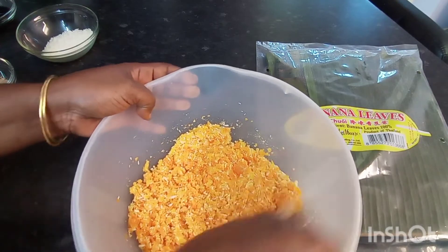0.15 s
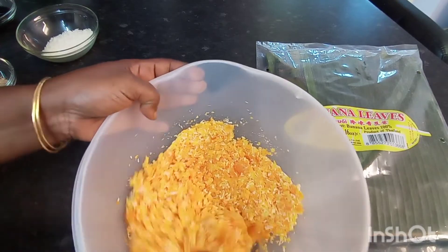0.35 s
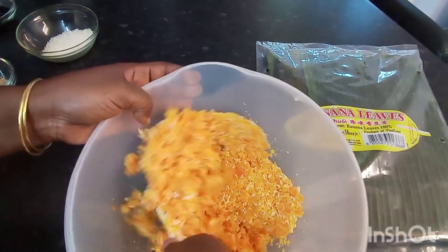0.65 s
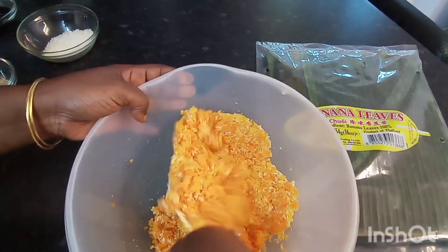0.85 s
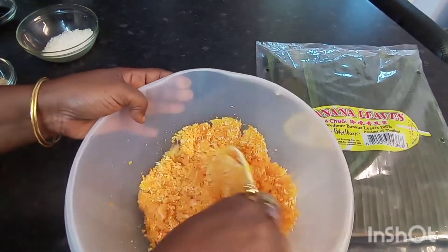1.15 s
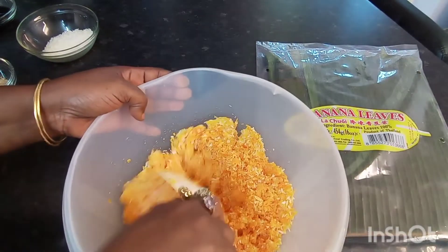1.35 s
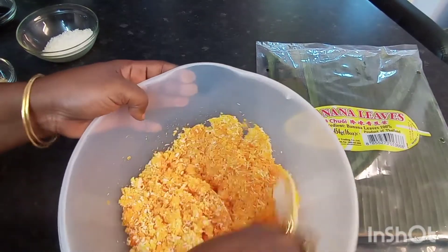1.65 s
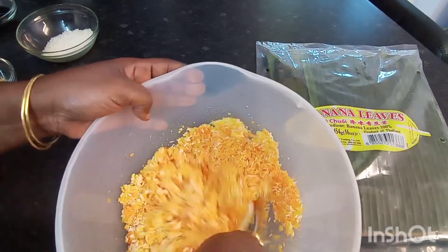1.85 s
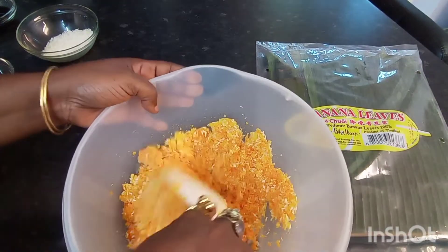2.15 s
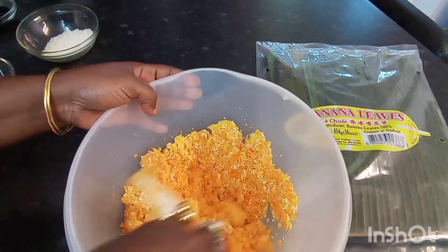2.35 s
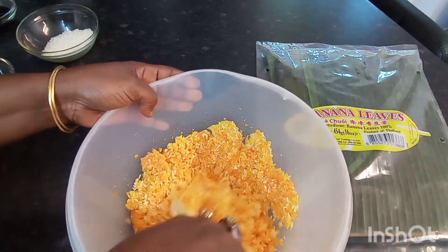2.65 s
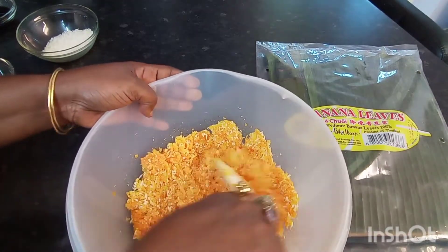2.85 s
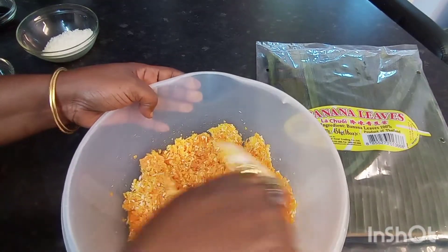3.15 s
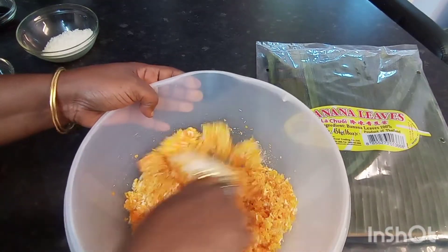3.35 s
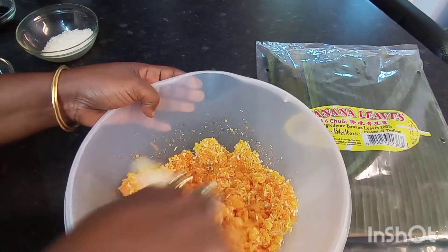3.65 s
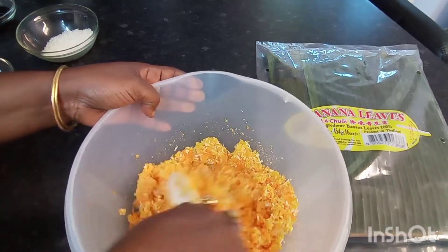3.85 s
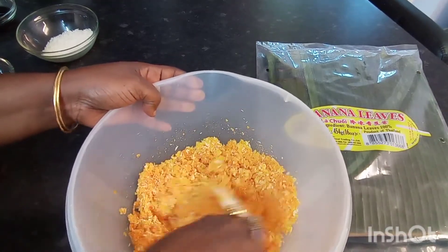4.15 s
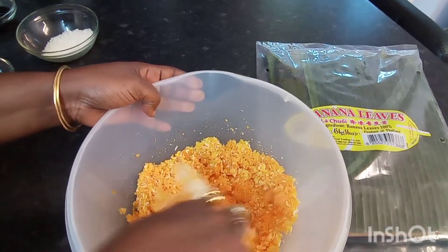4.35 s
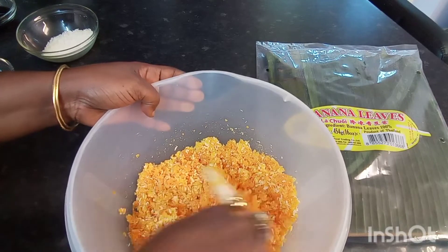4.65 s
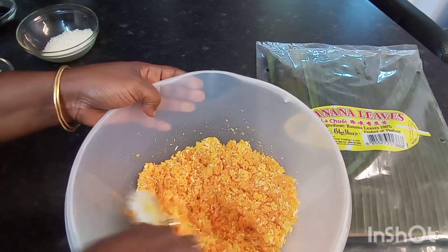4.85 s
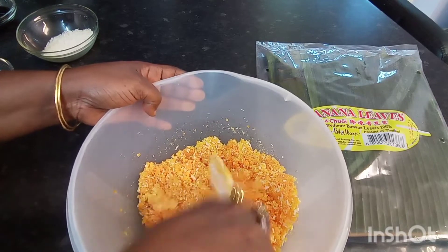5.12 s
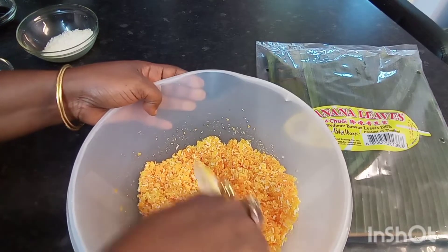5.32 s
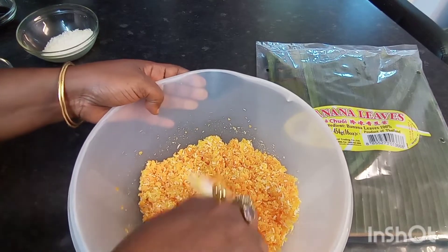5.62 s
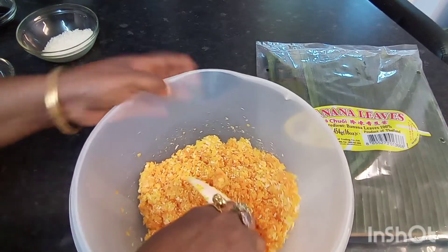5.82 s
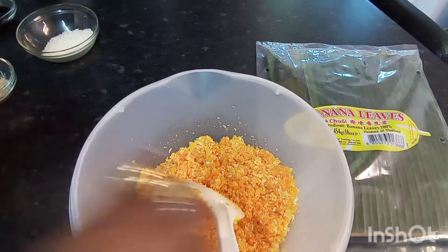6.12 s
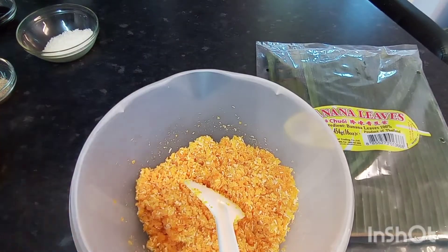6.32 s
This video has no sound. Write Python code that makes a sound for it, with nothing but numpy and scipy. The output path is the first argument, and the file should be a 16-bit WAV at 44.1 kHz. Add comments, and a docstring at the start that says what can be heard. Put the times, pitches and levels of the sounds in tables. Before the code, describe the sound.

Close, gritty stirring of a damp crumbly mixture in a plastic bowl. Uneven strokes swell and fade, with rough clicks and brief sinking skids on the wall. Hollow plastic clacks punctuate it, strongest around one, two and five seconds. Strokes grow fainter, then the spatula knocks the bowl and something slides on the counter with a low groan. Small reflective kitchen, quiet air, small thin-bass microphone.

```python
"""A spatula stirs a damp, crumbly mixture of grated vegetable and meal in a plastic bowl: each stroke swells,
holds and dies away as random grains, coloured as crunch, rub, drag and fizz. Noise through a sinking resonance
makes the blade skid on the wall, rough clicks are slips, and damped modes ring when the bowl is knocked, near
the end as the spatula is let fall against it. A small hard kitchen answers as noise tail, echoes and standing
waves; something slides on the counter with a low groan of unsteady sines, over quiet room air and a faint hum."""
import sys
import numpy as np
from scipy import signal
from scipy.fft import rfft, irfft, next_fast_len
from scipy.io import wavfile
from scipy.ndimage import uniform_filter1d, map_coordinates

SR = 44100
rng = np.random.default_rng(int(sys.argv[2]) if len(sys.argv) > 2 else 0)


def log_audio(samples):
    """Write samples as a 16-bit WAV file to the path given in sys.argv[1]."""
    # one column per channel
    frames = np.atleast_2d(samples).T
    # limit to full scale, then quantise
    limited = np.clip(frames, -1, 1)
    pcm = np.round(limited * 32767).astype(np.int16)
    wavfile.write(sys.argv[1], SR, pcm)


N = 285617
SWING_DB = 36.5  # fall of a stroke over its attack or release time, and of a skid over its release time

# colour of the blade clicking on plastic: (frequency [Hz], relative level [dB per Hz])
BLADE_CLICK_SPECTRUM = [(100, -26), (400, -8.5), (800, -23.5), (1300, 5.5), (2000, 8), (3200, 0.5),
                        (4300, -5.5), (5300, -24.5), (6800, -23), (8500, -49.5), (15000, -34.5)]
# colour of grit rubbing on the bowl wall: (frequency [Hz], relative level [dB per Hz])
WALL_RUB_SPECTRUM = [(500, -24), (820, -13.5), (1020, -4.5), (1300, -1), (1800, 2.5), (2300, -5),
                     (3500, -31), (7000, -67.5)]


def amp(db):
    """Decibels to gain."""
    return 10 ** (np.asarray(db) / 20)


def unit(x):
    """Scale to rms 1."""
    return x / np.sqrt(np.mean(x ** 2) + 1e-20)


def along(points, hz):
    """Read (Hz, value) points on a log frequency axis."""
    point_hz, values = np.transpose(points)
    return np.interp(np.log(hz + 1), np.log(point_hz), values)


def wobble(rate):
    """A smooth random curve with rate knots a second."""
    knots = rng.standard_normal(int(N * rate / SR) + 4)
    return map_coordinates(knots, [np.arange(N) * rate / SR])


def filtered(x, response):
    """Multiply the spectrum of x by a response of frequency."""
    size = next_fast_len(N + SR // 2)
    hz = np.fft.rfftfreq(size, 1 / SR)
    return irfft(rfft(x, size) * response(hz), size)[:N]


def coloured(x, spectrum):
    """Shape x by a spectrum, at rms 1."""
    return unit(filtered(x, lambda hz: amp(along(spectrum, hz))))


def impulse(spectrum, size=2048):
    """The shortest causal (minimum-phase) click with this spectrum, of energy 1."""
    hz = np.fft.rfftfreq(size, 1 / SR)
    cepstrum = irfft(np.log(amp(along(spectrum, hz))))
    half = size // 2
    causal = 2 * cepstrum[:half] * (np.arange(half) > 0)
    click = irfft(np.exp(rfft(causal, size)))
    return click / np.linalg.norm(click)


def add(track, s, sound):
    """Mix a sound into the track at s seconds."""
    part = track[max(0, round(s * SR)):][:len(sound)]
    part += sound[:len(part)]


def grains(rate, spread_db):
    """Tiny impulses of uneven size at random moments, rate a second on average, at rms 1."""
    happens = rng.random(N) < rate / SR
    sizes = amp(spread_db * np.clip(rng.standard_normal(N), -2, 2))
    return unit(happens * sizes * np.sign(rng.standard_normal(N)))


def rasp(spectrum, t60):
    """A rough click of energy 1: coloured noise decaying by 60 dB per t60, its noise cut at a sixth of a second."""
    t = np.arange(SR // 6) / SR
    noise = rng.standard_normal(len(t)) * amp(-60 * t / t60)
    burst = signal.fftconvolve(noise, impulse(spectrum))
    return burst / np.linalg.norm(burst)


def glide(x, hz, width_hz):
    """Pass x through one resonance that follows the curve hz, at rms 1."""
    turn = np.exp(2j * np.pi * np.cumsum(hz) / SR)
    pole = np.exp(-np.pi * width_hz / SR)
    # shift the resonance down to 0 Hz, smooth, and shift it back
    return unit((turn * signal.lfilter([1], [1, -pole], x / turn)).real)


def background():
    """Room air is coloured noise, with a wavering bass layer and a faint hum from noise in a narrow resonance."""
    # colour of the room air: (frequency [Hz], relative level [dB per Hz])
    air_spectrum = [(25, -13.5), (60, 2.5), (130, 0), (190, 1), (300, -11.5), (800, -11.5), (2500, -13.5),
                    (5000, -25), (9000, -34.5), (15500, -29)]
    murk_spectrum = [(40, -25), (95, 0.5), (150, -2.5), (280, -15.5), (600, -45.5)]
    hum_spectrum = [(120, -20), (190, 0), (230, 0), (400, -30)]

    air = amp(-73.5) * coloured(rng.standard_normal(N), air_spectrum)
    murk_level = amp(-82.5 + 4.6 * wobble(10))
    murk = murk_level * coloured(rng.standard_normal(N), murk_spectrum)
    hum = glide(rng.standard_normal(N), np.full(N, 207), width_hz=14)
    hum_level = amp(-84) * amp(4 * wobble(4))
    return air + murk + hum_level * coloured(hum, hum_spectrum)


def slide():
    """Friction on the counter keeps a few low resonances droning unsteadily over a dull rumble."""
    # course of the slide, applied to drone and rumble alike: (time [s], level [dB])
    slide_course = [(6.08, -83), (6.14, -53.5), (6.27, -60), (6.34, -54), (6.39, -55), (6.45, -48.5),
                    (6.48, -51)]
    # resonances that groan: (frequency [Hz], relative level [dB])
    groan_modes = [(81, -13), (136, -2.5), (226, -15), (428, -20.5)]
    rumble_spectrum = [(40, -29.5), (90, -1.5), (250, -12), (450, -28), (1200, -44), (4000, -70.0)]

    t = np.arange(N) / SR
    drone = np.zeros(N)
    for hz, db in groan_modes:
        level = amp(db + 3.3 * wobble(25))
        drone += level * np.sin(2 * np.pi * hz * t + .5 * wobble(24))
    slips = grains(rate=1000, spread_db=3)
    rumble = amp(-1.5) * coloured(slips, rumble_spectrum)
    seconds, level_db = np.transpose(slide_course)
    level = amp(np.interp(t, seconds, level_db)) * (t > seconds[0])
    return level * (unit(drone) + rumble)


def answer(wet_db, modes_db, walls_db):
    """Early echoes, a diffuse noise tail from the hard walls, and the lingering standing waves."""
    # reverberation: (frequency [Hz], time to fall 60 dB [s])
    room_decay = [(100, .38), (450, 0.29), (1400, 0.35), (3500, 0.34), (8000, 0.22)]
    # standing waves of the kitchen: (frequency [Hz], relative level [dB])
    standing_waves = [(111, 0.5), (145, -5.5), (210, -4), (267, -4.5), (377, -3.5), (422, -4), (506, 5),
                      (543, -1.5), (1027, -1), (1095, -6), (1268, -0.5), (1374, -12.5)]
    # echoes off near surfaces, before the overall echo level: (delay [s], signed relative gain [factor])
    near_surfaces = [(.0047, 0.08), (.0093, -0.058), (0.0154, 0.21), (0.0181, 0.076), (0.03, -.1),
                     (.0445, 0.23), (0.054, -0.046)]

    hz, frames, z = signal.stft(rng.standard_normal(SR * 3 // 4), SR, nperseg=256)
    decay = amp(-60 * frames / along(room_decay, hz)[:, None])
    tail = signal.istft(z * decay, SR, nperseg=256)[1]
    t = np.arange(len(tail)) / SR
    waves = np.zeros(len(t))
    for f, db in standing_waves:
        level = amp(db - 60 * t / along(room_decay, f))
        waves += level * np.sin(2 * np.pi * (f * t + rng.random()))
    build = 1 - np.exp(-t / 0.012)
    diffuse = amp(wet_db) * tail / np.linalg.norm(tail)
    lingering = amp(modes_db) * waves / np.linalg.norm(waves)
    room = build * (diffuse + lingering)
    for delay, gain in near_surfaces:
        add(room, delay, amp([walls_db]) * gain)
    return room


def kitchen(x, wet_db, modes_db, walls_db):
    """Direct sound plus the room, its answer redrawn every half second as arm and bowl move."""
    heard, block = x.copy(), SR // 2
    for start in range(0, N, block):
        room = answer(wet_db, modes_db, walls_db)
        add(heard, start / SR, signal.fftconvolve(x[start:start + block], room))
    return heard


def cavity(x, delay, gain):
    """Sound bounces across the bowl, which rings at even steps of frequency."""
    return filtered(x, lambda hz: 1 / (1 - gain * np.exp(-2j * np.pi * hz * delay)))


def knocks():
    """The mixture damps the bowl, so a blow is a few quick cycles of its modes and a scatter of crumbs."""
    # blows on the bowl: a thump of the loaded bottom, a clack of the wall and a tick of the blade:
    # (time [s], thump drive [dB], thump centre [Hz], clack drive [dB], clack centre [Hz],
    #  blade drive [dB], ring length [factor])
    blows = [(.057, -62, 288, -66, 1390, -84, 2.1), (.235, -40.5, 379, -53, 1670, -52.5, 0.67),
             (.394, -40, 368, -39, 1250, -43, 0.79), (0.74, -54, 600, -70, 1100, -64, 0.88),
             (1.076, -53, 474, -66.5, 1400, -57, 2.3), (1.3304, -30, 401, -20.5, 1134, -35, 2.13),
             (1.808, -42.5, 373, -50.5, 1732, -60.5, 0.87), (2.0598, -29.5, 354, -20, 1436, -33.5, 1.25),
             (2.603, -53.5, 480, -78, 1620, -67, 1.8), (2.659, -46.5, 360, -52, 1796, -59, 0.95),
             (3.1164, -32, 332, -47.5, 1360, -48, .85), (3.313, -45, 246, -68, 1500, -75, 1.3),
             (3.3748, -20.5, 353, -39.5, 1225, -34, 0.62), (4.66, -55, 200, -75.5, 1793, -81, 1.2),
             (4.9396, -34, 408, -26, 1380, -35, 1.12), (5.061, -45.5, 276, -52, 1080, -63, 0.67),
             (5.861, -74, 311, -46.5, 1050, -74, 1.3), (6.003, -30, 507, -19.5, 1343, -32.5, 1.9),
             (6.109, -38.5, 296, -39, 930, -57, 0.87), (6.163, -47.5, 280, -48.5, 1360, -70, 1.1),
             (6.252, -49.5, 433, -47, 940, -73, 1.5), (6.281, -55, 357, -70.5, 1100, -85, 0.81)]
    # modes of the loaded bowl and the blade, before the spread and ring length of each blow:
    # (frequency [Hz], relative level [dB], time to fall 60 dB [s])
    bowl_modes = [(107, 4, 0.29), (199, 12, 0.03), (422.3, 9.5, 0.036), (549, 10.5, 0.038),
                  (627, 11.5, .02), (1053, 8, 0.018), (1337, 5, 0.024), (1481, 4.5, 0.019),
                  (1754, 10, 0.015), (2310, 6.5, 0.019), (2705, 11, 0.011), (3100, 15, 0.0053),
                  (3840, 7.5, 0.0027), (6445, -29, 0.015)]
    # colour of crumbs that settle after a blow: (frequency [Hz], relative level [dB per Hz])
    settling_spectrum = [(500, -40), (1050, -10), (1800, 1), (2900, 1.5), (4200, -10), (5200, -26),
                         (6700, -29.5), (8000, -49.5), (16000, -75.5)]
    thump_fall_db, clack_fall_db, blade_fall_db = 13, 17.5, 10.5  # loss of a mode one octave off centre
    fall_curve = 1.52  # growth of that loss with distance in octaves
    blade_hz = 3040  # middle of the blade's own ring

    track, t = np.zeros(N), np.arange(SR // 6) / SR
    hz, mode_db, t60 = np.transpose(bowl_modes)
    # neighbouring modes swing against each other, so the knock takes a moment to swell
    sign = (-1) ** np.arange(len(hz))
    onset = 1 - np.exp(-(t / 0.00032) ** 2)

    def near(centre_hz, fall_db):
        octaves = np.abs(np.log2(hz / centre_hz))
        return amp(-fall_db * octaves ** fall_curve)

    for s, thump_db, thump_hz, clack_db, clack_hz, blade_db, length in blows:
        thump = amp(thump_db) * near(thump_hz, thump_fall_db)
        clack = amp(clack_db) * near(clack_hz, clack_fall_db)
        blade = amp(blade_db) * near(blade_hz, blade_fall_db)
        drive = np.max([thump, clack, blade], axis=0)
        gain = sign * amp(mode_db) * drive / np.sqrt(length)
        # the heap lies differently at every blow
        loaded_hz = hz * (1 + 0.022 * rng.standard_normal(len(hz)))
        decay = amp(-60 * t / (length * t60[:, None]))
        ring = gain @ (np.sin(2 * np.pi * loaded_hz[:, None] * t) * decay)
        add(track, s, ring * onset)
        contact = rasp(BLADE_CLICK_SPECTRUM, t60=0.0072)
        add(track, s, amp(blade_db + 18) * contact)
        crumbs = rasp(settling_spectrum, t60=0.45)
        add(track, s, amp(blade_db + 19.5) * crumbs)
    return track


def snaps():
    """The blade's edge slips off a hard grain and clicks roughly on the wall, each slip with its own brightness."""
    # slips: (time [s], level before a common boost [dB], tilt around 1 kHz, up to 8 kHz [dB per octave])
    slips = [(.247, -32, -4), (0.396, -45, -2), (0.4706, -27.5, 2), (0.517, -51, -1), (0.54, -34, -7),
             (.991, -55.5, 9), (1.13, -39, -3), (1.145, -39.5, 0.5), (1.571, -35, 2.5), (1.805, -35, 4.5),
             (2.061, -49, 12), (2.263, -45, -4.5), (2.362, -53, -5), (2.531, -58.5, 3), (2.969, -57.5, 2.5),
             (3.232, -56, 16), (3.844, -48.5, -3), (4.151, -47, 1.5), (5.896, -51.5, -13)]

    track = np.zeros(N)
    for s, db, tilt_db in slips:
        spectrum = []
        for hz, level in BLADE_CLICK_SPECTRUM:
            octaves = np.log2(min(hz, 8000) / 1000)
            spectrum.append((hz, level + tilt_db * octaves))
        add(track, s, amp(db + 19.0) * rasp(spectrum, t60=0.013))
    return track


def skids():
    """Grit under the blade drives one resonance of the bare wall, which sinks through each skid."""
    # skids: (time [s], length of the pitch fall, twice the level's rise and hold [s], level [dB],
    #         starting pitch [Hz])
    wall_skids = [(.243, 0.023, -39.5, 1700), (.475, .16, -39, 1600), (1.803, .035, -37.5, 1900),
                  (1.85, 0.026, -40.5, 1650), (1.905, 0.072, -37.5, 1330), (2.38, .05, -56, 1850),
                  (4.14, 0.065, -58, 2104), (5.85, 0.043, -49.5, 1150)]
    sag_oct_per_s, width_hz = 6.1, 260  # the pitch sinks as the blade presses in
    attack_s, release_s = 0.0098, .06

    t = np.arange(N) / SR
    level, hz = np.zeros(N), np.full(N, float(wall_skids[0][3]))
    for s, length, db, start_hz in wall_skids:
        age = np.maximum(t - s, 0)
        rise = np.minimum(age / attack_s, 1)
        fall_db = SWING_DB * np.clip((age - length / 2) / release_s, 0, 10)
        level += rise * amp(db - fall_db)
        sinking_hz = start_hz * 2 ** (-sag_oct_per_s * np.minimum(age, length))
        hz = np.where(t > s, sinking_hz, hz)
    grit = coloured(grains(rate=2200, spread_db=0.5), WALL_RUB_SPECTRUM)
    return level * glide(grit, hz, width_hz=width_hz)


def stirring():
    """Crumbs break in clumps ahead of the blade, grate on the wall and shake the bowl as the heap is dragged."""
    # strokes through the heap, before the trim of each layer: (time of full push [s], attack [s], hold [s],
    # release [s], push [dB], rub on the wall re push [dB], drag of the heap re push [dB])
    strokes = [(.17, .03, .01, .07, -71, -12, -15), (.24, .022, .21, .1, -49, 0, -2),
               (.48, .06, .045, .35, -42, 3, -8), (.8, .15, .13, .08, -58, -1, -14),
               (1.135, .16, .005, .19, -53, 3, -4), (1.42, .11, .01, .25, -45, 2, -9),
               (1.812, .09, .01, .33, -41, 1, -2), (2.25, .1, .005, .15, -63, 6, -3),
               (2.41, .09, .02, .15, -64, 5, -7), (2.65, .15, .025, .21, -46, 3, -5),
               (3.11, .14, .005, .2, -53, 2, -2), (3.39, .06, .05, .12, -48, -8, 0),
               (3.51, .09, .035, .24, -46, -4, -10), (3.87, .075, .035, .16, -52, -2, -11),
               (4.275, .11, .025, .13, -56, 1, -7), (4.625, .11, .02, .12, -64, -4, -4),
               (5.87, .14, .03, .09, -64, 5, 2), (5.295, .04, .025, .15, -67, -1, -4),
               (5.595, .11, .01, .22, -63, -4, -1)]
    # colours of breaking crumbs, dragged heap, fine fizz and the blade's entry:
    # each (frequency [Hz], relative level [dB per Hz])
    crunch_spectrum = [(500, -50.5), (820, -25), (1050, -10.5), (1800, 0), (2400, 2.5), (3100, -1),
                       (4200, -9.5), (5200, -24), (6700, -27), (7800, -49), (10000, -60), (16000, -73.5)]
    drag_spectrum = [(30, -37.5), (70, -12.5), (110, -2), (200, -7), (280, -13.5), (370, 2), (540, 2.5),
                     (750, -8), (1100, -16.5), (3000, -58.5)]
    fizz_spectrum = [(4000, -28.5), (7000, 3), (9000, -4), (12500, -9), (15500, -6)]
    entry_spectrum = [(2500, -30), (4500, -1), (5500, -9.5), (6700, -4), (8000, -22.5), (12000, -38.5)]
    attack_curve, release_curve = 1.31, 1.112  # above 1 rounds the top of the stroke
    # a thin hiss as the blade slices in, its lead a share of the attack
    entry_db, entry_lead, entry_width_s = -84.5, .1, .034

    t = np.arange(N) / SR
    push, rub_push, drag_push, entry = np.zeros((4, N))
    for s, attack, hold, release, db, rub_db, drag_db in strokes:
        before = (np.maximum(s - t, 0) / attack) ** attack_curve
        after = (np.maximum(t - s - hold, 0) / release) ** release_curve
        stroke = amp(db - SWING_DB * np.minimum(before + after, 10))
        push = np.maximum(push, stroke)
        rub_push = np.maximum(rub_push, stroke * amp(rub_db))
        drag_push = np.maximum(drag_push, stroke * amp(drag_db))
        # a stroke that hugs the wall slices less
        slice_level = amp(entry_db - max(rub_db, -3))
        entry += slice_level * np.exp(-((t - s + entry_lead * attack) / entry_width_s) ** 2)
    clumps = amp(1.4 * wobble(70))
    crumbs = grains(rate=2000, spread_db=2.5)
    crunch = amp(3.0) * push * clumps * coloured(crumbs, crunch_spectrum)
    wall_grit = grains(rate=710, spread_db=1.0)
    rub = amp(-3.5) * rub_push * clumps * coloured(wall_grit, WALL_RUB_SPECTRUM)
    heap = grains(rate=1100, spread_db=0.5)
    drag = amp(-0.24) * drag_push * coloured(heap, drag_spectrum)
    # harder pushes squeeze relatively more fine fizz out of the damp shreds
    fizz = amp(-24.5) * push ** 1.195 * coloured(crumbs, fizz_spectrum)
    hiss = entry * coloured(crumbs, entry_spectrum)
    return crunch + rub + drag + fizz + hiss


def scene():
    """Mix bowl and spatula in the kitchen with the slide on the counter and the room air."""
    blows = kitchen(knocks(), wet_db=-3.5, modes_db=-18.5, walls_db=-9)
    scraping = cavity(stirring() + skids() + snaps(), delay=0.0015, gain=0.2)
    strokes = kitchen(scraping, wet_db=-9.0, modes_db=-38, walls_db=-4.5)
    return (blows + strokes + slide() + background())[None]


def suppress(x, depth_db):
    """A noise suppressor turns down whatever is faint in each band, so treble tails end early."""
    # level below which the suppressor closes: (frequency [Hz], threshold [dB per STFT cell])
    closing_level = [(300, -125), (900, -90.5), (2000, -88), (5000, -95.5), (15000, -98)]

    hz, _, z = signal.stft(x, SR, nperseg=512)
    across_bands = uniform_filter1d(np.abs(z) ** 2, 3, axis=0)
    power = np.abs(uniform_filter1d(across_bands, 5, axis=1))
    threshold = amp(along(closing_level, hz))[:, None] ** 2
    closed = 1 / (1 + power / threshold)
    return signal.istft(z * amp(-depth_db * closed), SR, nperseg=512)[1][:N]


def record(dry):
    """A small microphone with thin bass, noise suppression and a band limit."""
    top_hz = 15750
    thin = filtered(dry[0], lambda hz: (1j * hz / (1j * hz + 55)) ** 2)
    return filtered(suppress(thin, depth_db=7.5), lambda hz: hz < top_hz)[None]


dry = scene()
out = record(dry)
log_audio(out)
```